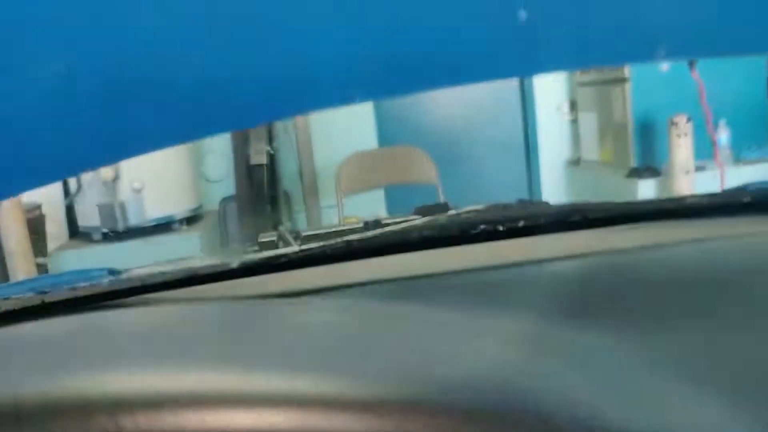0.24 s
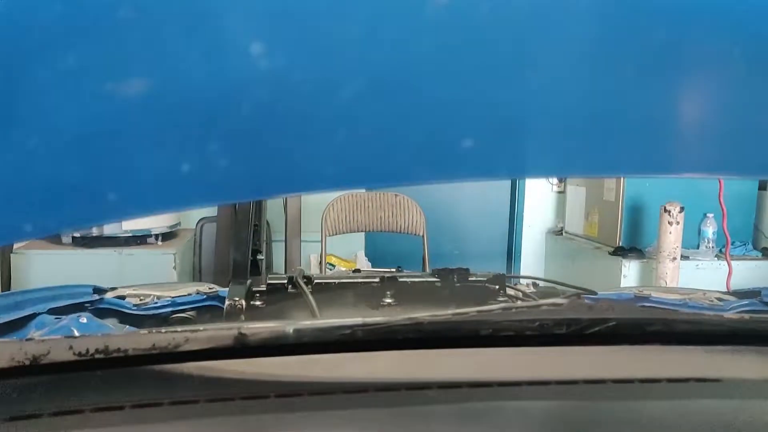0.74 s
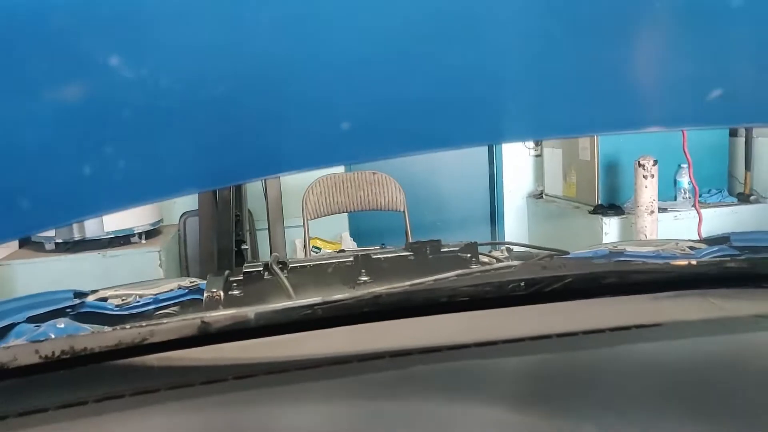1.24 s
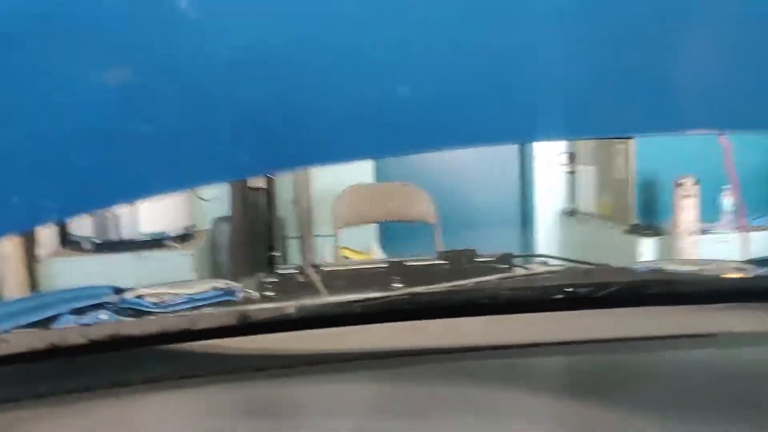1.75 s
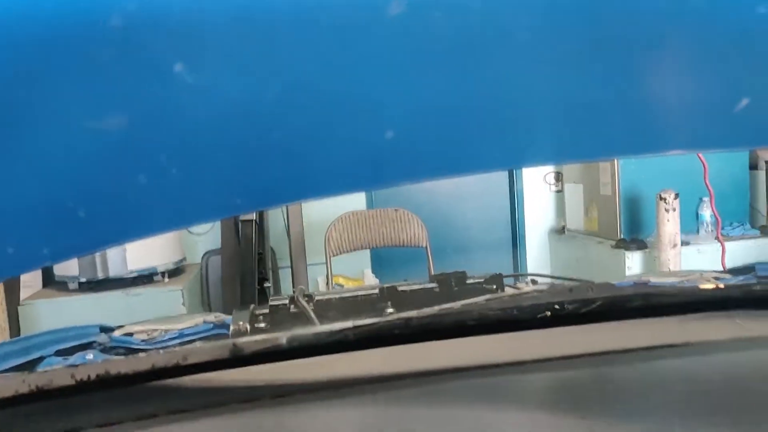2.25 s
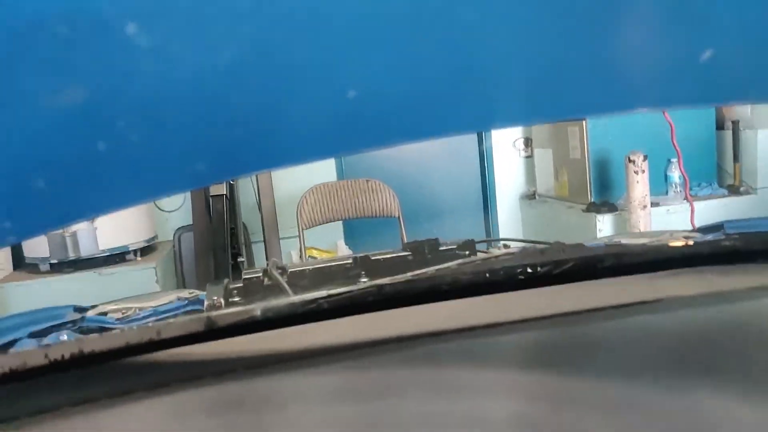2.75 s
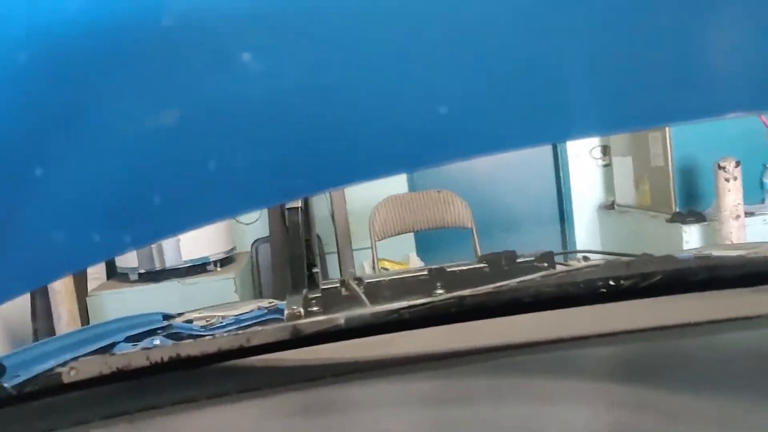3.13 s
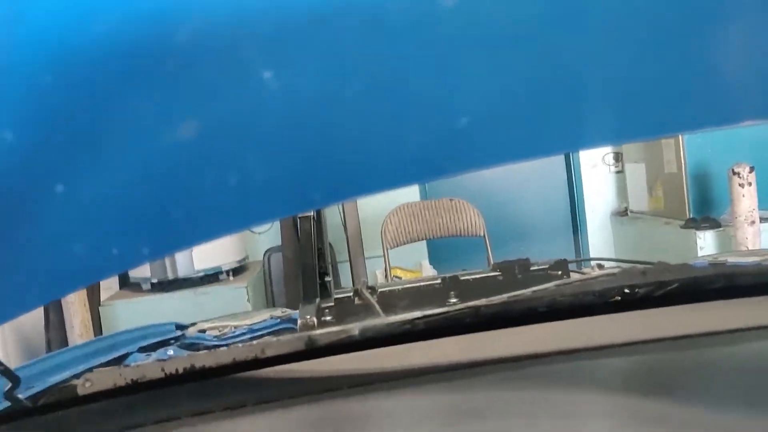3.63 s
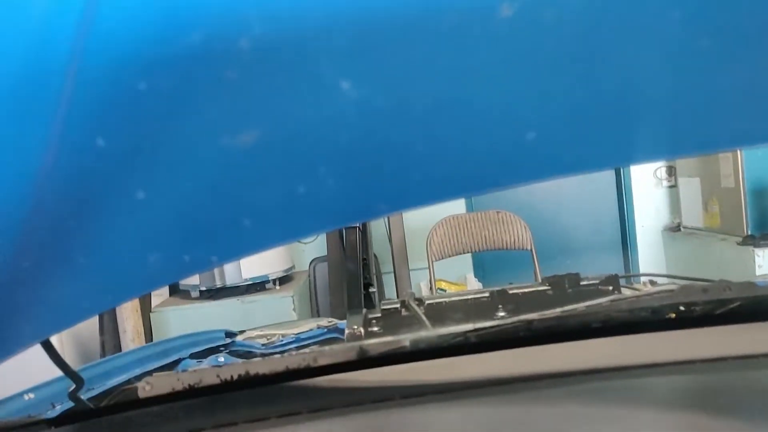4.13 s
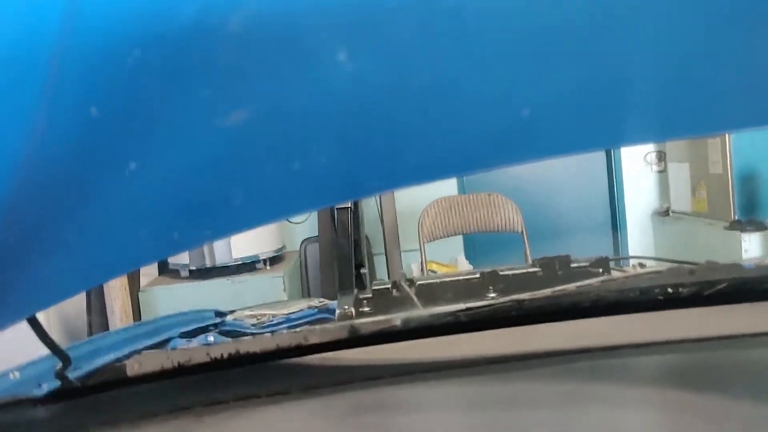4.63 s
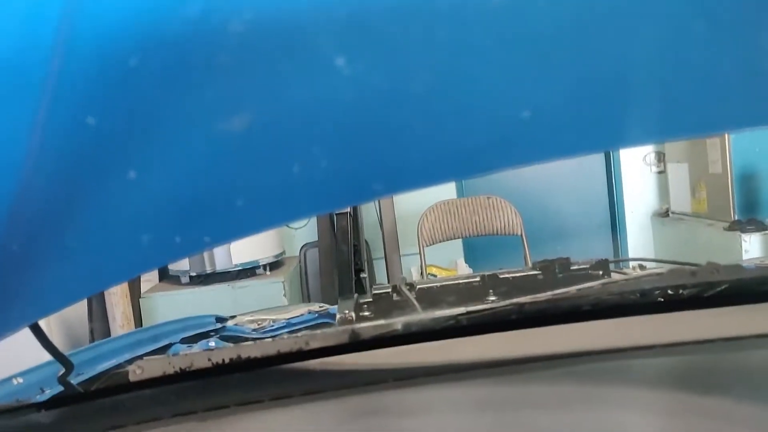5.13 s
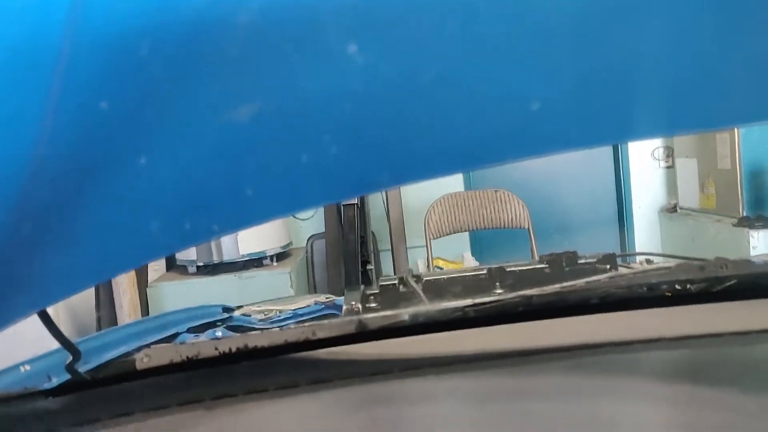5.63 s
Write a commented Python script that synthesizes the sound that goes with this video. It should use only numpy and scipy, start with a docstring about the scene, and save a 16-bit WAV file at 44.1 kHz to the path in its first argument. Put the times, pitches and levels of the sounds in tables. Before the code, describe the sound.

A misfiring car engine hunts up and down inside a close, boomy cabin. It begins fast and fairly steady, stumbles, then repeatedly catches itself with hollow, throaty gulps of air. Dry clicks and metallic rattles come and go in bursts, and a faint high fizz returns about every second and a half. Handheld stereo pickup, brightest treble leaning right.

```python
"""Driver's seat, bonnet up: a four-cylinder car engine drops from a fast idle and hunts, close to stalling.
Crank speed times everything. Uneven firing pulses, filtered, boom in the cabin and shake the body panels.
Noise gated by the intake strokes roars, hisses and rings the intake duct and air box at each recovery.
Loose metal clatters in noise bursts about once a crank turn, with a few dry clicks.
A thin fizz of noise and high sines returns at even intervals."""
import sys
import numpy as np
from scipy import signal
from scipy.fft import rfft, irfft
from scipy.io import wavfile
from scipy.ndimage import uniform_filter1d, map_coordinates

SR = 44100
rng = np.random.default_rng(int(sys.argv[2]) if len(sys.argv) > 2 else 0)


def wav_out(sig):
    """Save sig, one row per channel (or a flat mono array), as 16-bit PCM at SR to the path in sys.argv[1]."""
    wavfile.write(sys.argv[1], SR, np.round(np.clip(np.atleast_2d(sig).T, -1, 1) * 32767).astype(np.int16))


N = 259123
TIME = np.arange(N) / SR
FREQS = np.arange(N // 2 + 1) * SR / N + 0.00091  # offset keeps log(0) away

# Hunting idle. Each row: time in seconds, crank speed in turns per second.
CRANK = [(0, 31), (.7, 30.1), (.85, 27), (1, 20.3), (1.45, 19.8), (1.93, 25.5), (2.1, 23.3), (2.7, 22.8),
         (2.93, 25.2), (3.2, 20.9), (3.5, 21), (3.7, 19.3), (4.03, 24.5), (4.3, 22), (4.5, 22.5),
         (4.68, 18.7), (5.15, 22.6), (5.88, 19.3)]
# Gulps of air by which the engine catches itself. Each row: start in seconds, hold length in seconds,
# swell time in seconds, air flow in dB re a full surge, relative body shudder in dB.
SURGES = [(0.523, 0.16, 0.014, -4, -15.5), (0.66, 0.07, 0.015, -6, -23), (0.806, 0.059, 0.022, -6.5, -21.5),
          (0.992, 0.3, 0.085, -3.5, -20.5), (1.219, 0.32, 0.025, -5, -21), (1.502, 0.18, 0.027, -4, -28),
          (1.775, 0.21, 0.0044, -3, -17.5), (2.016, 0.096, 0.031, -4, -28), (2.189, 0.078, 0.06, -2.5, -18),
          (2.378, 0.053, 0.027, -3, -20.5), (2.557, 0.13, 0.0098, -7, -24.5),
          (2.72, 0.16, 0.031, -5.5, -19.5), (2.823, .14, 0.019, -5, -18), (3.004, 0.07, 0.019, -5.5, -22),
          (3.201, 0.27, 0.0089, -9.5, -22.5), (3.598, 0.46, 0.038, -2.5, -18),
          (4.06, 0.1, 0.02, -14, -25.5), (4.552, 0.28, 0.056, -5.5, -20), (4.729, 0.33, 0.067, -1, -16),
          (5.756, 0.17, 0.18, 6.5, -9.5)]
# Intake duct resonances. Each row: frequency in Hz, half-width in Hz, relative level in dB.
DUCT = [(540, 95, -8.5), (686.6, 32.4, -0.5), (916, 54, -11.5), (1158, 48, -8.5), (1238, 58, -8.5),
        (1580, 190, -16.5)]
FAST_IDLE_HZ = 27  # crank speed: fast-idle cylinder balance above, light knocks only below


def scene(boom_db=3.0, shudder_db=-1.0):
    """Crank speed times the layers, surges set their strength; the left side is shaded in most of the treble."""
    # Idle between surges. Each row: time in seconds, air flow in dB re a full surge, relative shudder in dB.
    idle = [(0, -8.5, -25), (.3, -10.5, -23.5), (.5, -10, -23), (1, -13.5, -25.5), (1.7, -13.5, -21),
            (2.5, -16, -25), (3.2, -10.5, -24), (3.55, -7.5, -26), (4.13, -14.5, -26), (4.24, -14, -26),
            (4.37, -15, -33), (4.52, -16, -27.5), (5.2, -10.5, -24), (5.35, -13.5, -28.5),
            (5.55, -13, -26.5), (5.72, -6.5, -22)]
    # Side balance. Each row: frequency in Hz, left minus right in dB.
    sides = [(30, 0.7), (150, 2.1), (700, 1.5), (1200, 1.9), (2500, -2), (4500, 0.1), (6300, 3), (7200, -4),
             (8300, -13), (12000, -11), (15500, -8)]
    # Air layer laws, one row each: level in dB at full surge, dB per dB of flow, dB lost running freely.
    throat_law = (-26, 1.39, 4.5)
    roar_law = (-31, 1, 0.16)
    hiss_law = (-32.5, 1.63, 5.4)

    turns = np.cumsum(crank_hz()) / SR
    idle_flow_db, idle_shake_db = curves(idle)
    *_, surge_flow_db, surge_shake_db = np.transpose(SURGES)
    flow_db = surging(idle_flow_db, surge_flow_db)
    shake_db = surging(idle_shake_db, surge_shake_db)

    pulses = firings(turns)
    lows = undb(stumbling() + boom_db) * boom(pulses)
    lows = lows + undb(shake_db + shudder_db) * shudder(pulses, turns) + thuds()

    mids = throat(turns, follow(throat_law, flow_db))
    mids = mids + undb(follow(roar_law, flow_db)) * intake(turns) + chuffs()

    highs = undb(follow(hiss_law, flow_db)) * (hiss(turns) + chatter(turns))
    highs = highs + rush(turns) + clatter(turns, flow_db) + clicks()

    ears = undb(shape(sides) * np.array([[.5], [-.5]]))
    ears = ears / np.sqrt(np.mean(ears ** 2, axis=0))
    return irfft(rfft(lows + mids + highs) * ears, N) + fizz()


def firings(turns, jitter_s_per_db=0.00083):
    """Two pulses a turn; unequal cylinders, random strength and timing make the beat limp."""
    # Firing scatter. Each row: time in seconds, standard deviation of strength in dB.
    scatter = [(0, .8), (.5, 1), (.6, 2.4), (.9, 2.6), (2.4, 1.7), (3.6, 2.4), (4.5, 3), (5.88, 2.8)]
    # Cylinder strengths in firing order in dB, hunting and at the fast idle.
    hunting_db = [4, -3, -3, -2]
    fast_db = [5.5, -5, -0.5, -5]

    at = np.flatnonzero(np.diff(np.floor(2 * turns), prepend=-1))
    chance = rng.standard_normal((len(at), 2))
    scatter_db = curves(scatter)[0][at]
    fast = crank_hz()[at] > FAST_IDLE_HZ
    cylinder_db = np.where(fast, np.resize(fast_db, len(at)), np.resize(hunting_db, len(at)))
    shift = (jitter_s_per_db * SR * scatter_db * chance[:, 1]).astype(int)
    pulses = np.zeros(N)
    pulses[np.clip(at + shift, 0, N - 1)] = undb(cylinder_db + scatter_db * chance[:, 0])
    return pulses - pulses.mean()


def boom(pulses):
    """The firings pump the low air modes of the cabin."""
    # Cabin response. Each row: frequency in Hz, gain in dB.
    cabin = [(10, -28), (20, -2), (27, 3.5), (31, 5.8), (36, -.3), (45, 1.6), (53, -2), (62, 2.5),
             (74, -13), (110, -35), (300, -80), (3000, -140)]
    return even(colour(pulses, shape(cabin)), span_s=0.037)


def stumbling(half_width_s=0.022):
    """Boom level in dB, before the overall boom gain: a slow curve with a brief dip at each stumble."""
    # Boom curve. Each row: time in seconds, relative level in dB.
    boom_level = [(0, -15), (1.1, -16), (1.9, -15), (2.6, -16), (2.9, -14), (3.7, -18.5), (3.92, -14),
                  (4.25, -19), (4.6, -20), (4.98, -13.5), (5.3, -20.5), (5.55, -20.5), (5.88, -16)]
    # Stumbles. Each row: time in seconds, dip in dB (negative lifts).
    stumbles = [(.6, 3.5), (.86, 1), (.95, 6), (1.19, 24), (1.38, -1), (1.718, 8), (2.0, 10.5), (2.17, 7),
                (2.33, 1), (2.49, 3), (2.69, 16), (3.0, 5.5), (3.16, 8), (3.34, 12), (3.575, 4), (4.24, 7),
                (4.47, 10), (4.64, 2), (4.75, 6), (5.5, 13)]
    dips_db = sum(db * np.exp(-((TIME - s) / half_width_s) ** 2) for s, db in stumbles)
    return curves(boom_level)[0] - dips_db


def shudder(pulses, turns, loose_db=4.0):
    """Body panels follow the firings and also rumble loosely, as noise, after each."""
    # Panel response. Each row: frequency in Hz, gain in dB.
    body = [(40, -44.5), (80, 0), (95, 6), (115, -0.5), (150, -3), (200, -3.5), (250, -7.5), (310, -11.5),
            (400, -16.5), (480, -20), (800, -38.5), (3000, -100), (9000, -140)]
    forced = unit(colour(pulses, shape(body)))
    kicks = puffs(2 * turns, decay=.5, scatter_db=2)
    loose = unit(colour(air(0 * FREQS) * kicks, shape(body)))
    return even(forced + undb(loose_db) * loose, span_s=0.036)


def thuds(rise_s=.004, t60=.07):
    """A hard firing shakes a panel: a decaying sine."""
    # Thuds. Each row: start in seconds, level in dB ahead of the envelope, pitch in Hz.
    thud_rows = [(.171, -21, 195), (.236, -19, 193), (.301, -9, 198), (.366, -16, 192), (0.433, -10.5, 189),
                 (0.499, -7.5, 166), (0.615, -7, 165), (0.76, -6.5, 144), (1.042, -22, 177),
                 (1.45, -9, 152), (1.715, -8, 142), (1.893, -8.5, 196), (1.932, -9, 195), (2.069, -13, 137),
                 (2.119, -12, 157), (2.836, -11, 174), (3.64, -7.5, 188), (3.743, -16, 395),
                 (3.99, -10, 225), (4.821, -9, 240), (4.969, -7, 276), (5.23, -23, 208), (5.739, -10, 174),
                 (5.779, -15, 210), (5.834, -3, 239)]
    out, age = np.zeros(N), TIME[:SR // 5]
    envelope = (1 - np.exp(-age / rise_s)) * np.exp(-np.log(1000) * age / t60)
    for s, db, hz in thud_rows:
        i = int(s * SR)
        blow = undb(db) * envelope * np.sin(2 * np.pi * (hz * age + rng.random()))
        out[i:i + len(age)] += blow[:N - i]
    return out


def surging(idle_db, peaks_db):
    """A level in dB: each surge swells, holds and dies away, its power added to the idle."""
    release_s = 0.046
    power = undb(idle_db) ** 2
    for (start, length, swell_s, *_), db in zip(SURGES, peaks_db):
        swell = 1 - np.exp(-np.maximum(TIME - start, 0) / swell_s)
        fade = np.exp(-np.maximum(TIME - start - length, 0) / release_s)
        power = power + (undb(db) * swell * fade) ** 2
    return 10 * np.log10(power)


def follow(law, flow_db, labour_hz=21, free_hz=23.9):
    """Layer level in dB: grows with air flow, eases as the crank goes from labouring to free running."""
    full_db, slope, lost_db = law
    free = np.clip((crank_hz() - labour_hz) / (free_hz - labour_hz), 0, 1)
    return full_db + slope * flow_db - lost_db * free


def gulps(turns):
    """Turbulent air drawn in at each intake stroke."""
    drawn = swaying(air(ripples(ripple_db=4.6, spacing_hz=54)))
    return drawn * puffs(2 * turns, decay=1.0, scatter_db=3.5)


def intake(turns):
    """The broad roar of the intake: gulps through a fixed spectrum."""
    # Roar spectrum. Each row: frequency in Hz, gain in dB.
    roar = [(150, -33), (330, -1.5), (470, 5.5), (600, 5), (800, 5.5), (980, 2), (1300, -6.5), (1600, -1.5),
            (2000, -9), (2600, -9.5), (4000, -20), (9000, -37)]
    return even(colour(gulps(turns), shape(roar)), span_s=0.035)


def throat(turns, throat_db, box_db=4, box_growth=0.42, duct_db=-3.5):
    """The duct sings with the flow; the deeper air box gains on it as the flow grows."""
    # Air box resonances. Each row: frequency in Hz, half-width in Hz, relative level in dB.
    air_box = [(250, 25, -7), (295, 22, -3), (342, 20, 1), (392, 22, 1)]
    box_gain = undb(box_db + box_growth * (throat_db - throat_db.max()))
    box = box_gain * hollow(turns, air_box, centre_hz=310)
    duct = undb(duct_db) * hollow(turns, DUCT, centre_hz=680)
    return undb(throat_db) * (duct + box)


def hollow(turns, modes, centre_hz):
    """The gulps ring a cavity with a hollow note."""
    return even(colour(gulps(turns), cavity(modes, centre_hz)), span_s=0.07)


def cavity(modes, centre_hz):
    """Response in dB of a cavity: summed resonances under a broad hump."""
    gain = sum(undb(db) / (1 + (FREQS - hz) ** 2 / width ** 2) for hz, width, db in modes)
    return 20 * np.log10(gain) + band(centre_hz, octaves=1.74)


def chuffs(centre_hz=690):
    """A hard gulp barks in the duct: a short burst of noise with its resonances."""
    # Chuffs. Each row: start in seconds, level in dB ahead of the envelope.
    chuff_rows = [(1.093, -21), (1.143, -30), (1.163, -18), (1.195, -16.5), (1.215, -20), (1.262, -17),
                  (1.279, -15), (1.318, -27), (1.365, -16), (1.4, -17), (1.444, -16.5), (1.466, -12.5),
                  (1.497, -14.5), (1.612, -25), (1.894, -30), (2.926, -29), (3.62, -21.5), (3.669, -16),
                  (3.74, -19), (3.823, -15.5), (3.87, -21), (3.945, -25), (4.655, -21), (4.742, -21),
                  (4.765, -28), (4.819, -13), (4.87, -27), (4.902, -14), (4.97, -25), (5.759, -28),
                  (5.778, -17.5), (5.812, -28), (5.836, -16)]
    s, db = np.transpose(chuff_rows)
    note = even(air(cavity(DUCT, centre_hz) + band(centre_hz, octaves=.8)), span_s=.008)
    return note * strikes(s, db, rise_s=.004, t60=.06)


def hiss(turns, valve_share=0.25):
    """Air rushes past the throttle in a coarse flutter; the valves tick in it and its colour slides."""
    # Hiss spectrum. Each row: frequency in Hz, gain in dB.
    spectrum = [(300, -44), (900, -31), (1800, 10), (2700, 10), (3500, 6.5), (4400, 10.5), (5200, 6),
                (6300, 12.5), (7200, 3.5), (8500, -2.5), (11000, -1), (15700, -3)]
    rushing = swaying(air(ripples(ripple_db=5.5, spacing_hz=70)))
    ticking = 1 - valve_share + valve_share * puffs(2 * turns, decay=0.089, scatter_db=11.0)
    flutter = grain(contacts_per_s=220, scatter_db=2.4)
    return unit(colour(rushing, shape(spectrum))) * ticking * flutter


def rush(turns):
    """A coarse, bright rush of air that flutters with the intake strokes."""
    # Rush. Each row: time in seconds, level in dB.
    rush_level = [(0, -56.5), (1, -53.5), (1.13, -45), (1.27, -38.5), (1.55, -41.5), (1.68, -47),
                  (1.75, -59), (5.88, -62)]
    flutter = puffs(2 * turns, decay=1.3, scatter_db=2)
    coarse = grain(contacts_per_s=400, scatter_db=4)
    bright = air(band(5500, octaves=.72) + ripples(ripple_db=1.5, spacing_hz=190))
    return undb(curves(rush_level)[0]) * flutter * coarse * bright


def clatter(turns, flow_db, ring_db=-1, sizzle_db=-2.0, clank_db=1, ripple_db=2):
    """Loose metal is thrown against its seat, buzzes there in coarse contacts and rings in its modes."""
    # Ring spectrum. Each row: frequency in Hz, gain in dB.
    metal = [(500, -52), (1500, 6), (3500, -6.5), (4400, 3), (5200, -3), (6400, 6.5), (7300, -1),
             (9000, 1.5), (11500, -1.5), (14000, -29)]
    s, db, sizzle, clank = np.transpose(knocks(turns, flow_db))
    contact_s = .001
    buzz = grain(contacts_per_s=1100, scatter_db=4.2)
    ring = air(shape(metal)) * strikes(s, db + ring_db, contact_s, t60=0.055)
    top = air(band(15200, octaves=0.47)) * strikes(s, db + sizzle + sizzle_db, contact_s, t60=0.027)
    low = air(band(1400, octaves=2.07)) * strikes(s, db + clank + clank_db, contact_s, t60=0.061)
    modes_db = metal_peaks() + ripples(ripple_db, spacing_hz=161.3)
    return colour(buzz * (ring + top + low), modes_db)


def knocks(turns, flow_db):
    """Rows (s, dB, sizzle dB, clank dB): listed knocks, and light ones on the other slow crank turns."""
    # Listed knocks, from hard blows to faint ticks in the lulls.
    # Each row: time in seconds, relative level in dB, sizzle in dB re the knock.
    listed = [(0.593, -27.5, 4), (0.769, -32, 7), (1.039, -43, -21), (1.088, -32.5, -18),
              (1.139, -31.5, -20), (1.1907, -29.5, -18), (1.243, -26, -18), (1.3428, -28.5, -16),
              (1.394, -34, -18), (1.443, -32, -14), (1.613, -39, -11), (1.844, -26, 6), (1.886, -23, 8.5),
              (1.927, -21, 6), (1.963, -23.5, 7), (1.999, -30, 3), (2.043, -35, -7), (2.121, -28.5, 2),
              (2.193, -33.5, 9), (2.234, -26.5, 6), (2.2758, -26, 8), (2.386, -49, -17), (2.462, -37.5, 1),
              (2.56, -51.5, -19), (2.6365, -36.5, 6), (2.734, -62, -13), (2.7925, -34.5, 8),
              (2.835, -31, -1), (2.8808, -24, 9), (2.9198, -25, 10), (2.96, -22.5, 6), (2.982, -27.5, 0),
              (2.997, -28.5, 5), (3.053, -35, 0), (3.165, -39.5, -8), (3.215, -33.5, 4), (3.234, -35, -3),
              (3.263, -31, -2), (3.283, -33, -2), (3.313, -36, -1), (3.334, -33.5, -4), (3.367, -33, -6),
              (3.412, -35, -5), (3.432, -37, -3), (3.462, -33.5, -3), (3.6622, -27, 0), (3.955, -22.5, 7),
              (3.9984, -21.5, 7), (4.038, -25.5, 7), (4.064, -28, 6), (4.077, -28.5, 5), (4.138, -41, -14),
              (4.158, -45, -16), (4.263, -44, -16), (4.3195, -48, -16), (4.343, -45, -14),
              (4.3865, -51, -16), (4.4385, -42, -14), (4.458, -41.5, -14), (4.474, -54, -14),
              (4.53, -48, -14), (4.566, -66, -24), (4.631, -33.5, -15), (4.683, -31, -2),
              (4.7404, -27.5, 0), (4.845, -24.5, -7), (5.039, -26, 10), (5.113, -25, 7), (5.139, -28.5, 3),
              (5.2153, -36.5, -3), (5.263, -43, -12), (5.372, -41.5, 5), (5.422, -40.5, -10),
              (5.437, -38, 0), (5.4697, -63, -8), (5.482, -43, 4), (5.571, -43, -10), (5.633, -47, -12),
              (5.658, -35, -9), (5.755, -32.5, 9), (5.808, -29, 5)]
    listed_clank_db, light_clank_db, light_sizzle_db = -6, -2, -18  # re the knock
    light_db, light_scatter_db, db_per_flow_db = -34, 3, .8  # light_db is at full surge

    at = np.flatnonzero(np.diff(np.floor(turns)))
    hz = crank_hz()[at]
    db = light_db + db_per_flow_db * flow_db[at] + light_scatter_db * rng.standard_normal(len(at))
    turns_from_listed = hz * np.abs(TIME[at, None] - np.array(listed)[:, 0]).min(axis=1)
    free = (hz < FAST_IDLE_HZ) & (turns_from_listed > 1)
    light = [(s, size, light_sizzle_db, light_clank_db) for s, size in zip(TIME[at][free], db[free])]
    return [(*row, listed_clank_db) for row in listed] + light


def metal_peaks():
    """The modes of the loose metal as humps in dB."""
    # Metal modes. Each row: frequency in Hz, full width in Hz, height in dB.
    modes = [(4050, 60, 3), (4471, 100, 6), (5799, 90, 7), (6380, 130, 7), (8942, 80, 5), (9400, 90, 4),
             (10250, 90, 4), (13830, 150, 3), (14656, 120, 6), (15212, 130, 11)]
    return sum(gain / (1 + (2 * (FREQS - hz) / width) ** 2) for hz, width, gain in modes)


def chatter(turns, level_db=-6, taps_per_turn=3.1):
    """Below the fast idle the shaking engine keeps the loose metal tapping lightly; level re the hiss."""
    # Tapping spectrum. Each row: frequency in Hz, gain in dB.
    spectrum = [(700, -43), (2000, -40), (4400, -47), (6400, -28), (7600, 14), (10000, 11.5), (13000, 14),
                (15700, 12)]
    shaken = np.clip((30 - crank_hz()) / 3, .02, 1)
    fired = puffs(2 * turns, decay=0.5, scatter_db=5)
    tapped = puffs(taps_per_turn * turns, decay=0.6, scatter_db=5)
    return undb(level_db) * shaken * unit(fired + tapped) * air(shape(spectrum) + metal_peaks())


def clicks(snap_hz=4000, knock_hz=1100):
    """A few dry clicks: a bright snap over a dull knock, both noise bursts."""
    # Clicks. Each row: time in seconds, snap in dB, knock in dB, both ahead of the envelope.
    click_rows = [(.289, -35, -42), (.594, -22, -27), (1.782, -13, -23), (1.791, -23, -19),
                  (1.825, -28, -27)]
    s, snap_db, knock_db = np.transpose(click_rows)
    snap = strikes(s, snap_db, rise_s=0.0002, t60=0.004)
    knock = strikes(s, knock_db, rise_s=0.0003, t60=0.008)
    return air(band(snap_hz, octaves=1.55)) * snap + air(band(knock_hz, octaves=0.39)) * knock


def fizz(length_s=0.25, noise_db=-50, whistle_db=-57, spurt_db=-39, ease_s=.05):
    """A thin noise with faint high sines starts with a spurt and dies away again."""
    # Start times in seconds.
    starts = [0.661, 2.1, 3.55, 5.003]
    # Whistles. Each row: frequency in Hz, relative level in dB.
    whistle_rows = [(7144, -5), (7481, 0), (7748, -5), (7971, -1), (8340, -3), (8942, -4), (9960, -10)]
    # Fizz spectrum. Each row: frequency in Hz, gain in dB.
    spectrum = [(1500, -20), (3000, -22), (6000, 2), (8000, 6), (11000, 3), (15000, -9)]
    corners_s = [0, ease_s / 2, length_s - ease_s, length_s + ease_s / 2]
    gate = sum(np.interp(TIME - s, corners_s, [0, 1, 1, 0]) for s in starts)
    spurt = strikes(starts, np.full(len(starts), spurt_db), rise_s=0.00044, t60=0.86)
    sines = [undb(db) * np.sin(2 * np.pi * (hz * TIME + rng.random())) for hz, db in whistle_rows]
    steady = undb(noise_db) * air(shape(spectrum)) + undb(whistle_db) * unit(sum(sines))
    return gate * steady + spurt * air(band(4300, octaves=1.4))


def air(db):
    """Coloured stereo noise of rms 1: a direct share that reaches the right first, and a diffuse share."""
    # Side likeness. Each row: frequency in Hz, direct share of the power from 0 to 1.
    likeness = [(60, 0.91), (150, 0.96), (300, 0.86), (600, 0.36), (1200, 0.081), (6000, 0.08),
                (15000, 0.081)]
    left_lag_s = .0004  # from 900 Hz up; shrinks in proportion below
    like = np.clip(shape(likeness), 0, 1)
    lag_s = np.array([[left_lag_s], [0]]) * np.minimum(FREQS / 900, 1)
    direct = rfft(rng.standard_normal(N)) * np.exp(-2j * np.pi * FREQS * lag_s)
    diffuse = rfft(rng.standard_normal((2, N)))
    return unit(irfft((np.sqrt(like) * direct + np.sqrt(1 - like) * diffuse) * undb(db), N))


def ripples(ripple_db=6.0, spacing_hz=70):
    """A random ripple over frequency, different on each side, colours the noise (dB)."""
    knots = np.arange(0, SR / 2, spacing_hz)
    heights = rng.standard_normal((2, 2000))
    return ripple_db * np.array([np.interp(FREQS, knots, h[:len(knots)]) for h in heights])


def swaying(x, depth=.022, rate_hz=1.1):
    """A varying delay slides the colour of a steady noise up and down; depth is the pitch share per sine."""
    rates_hz = rate_hz * np.array([.62, 1.47])
    lag_s = 0
    for r in rates_hz:
        lag_s = lag_s + depth / (2 * np.pi * r) * np.sin(2 * np.pi * (r * TIME + rng.random()))
    at = (TIME + lag_s) * SR
    return np.array([map_coordinates(side, [at], order=3, mode="mirror") for side in x])


def puffs(cycles, decay, scatter_db, rise=0.096):
    """A quick puff at the start of each cycle, each of its own size; decay and rise in cycles, rms 1."""
    sizes = undb(scatter_db * rng.standard_normal(1000))
    phase = cycles % 1
    return unit(sizes[cycles.astype(int)] * np.exp(-phase / decay) * (1 - np.exp(-phase / rise)))


def strikes(times, db, rise_s, t60):
    """Envelope of blows that swell fast and decay 60 dB per t60 seconds, cut at 0.2 s; powers add."""
    power = np.zeros(N)
    for s, size in zip(times, undb(db)):
        i = int(s * SR)
        age = TIME[:min(SR // 5, N - i)]
        blow = size * (1 - np.exp(-age / rise_s)) * undb(-60 * age / t60)
        power[i:i + len(age)] += blow ** 2
    return np.sqrt(power)


def grain(contacts_per_s, scatter_db):
    """Tiny contacts of uneven strength, as a gain of rms 1."""
    at = np.arange(0, N, SR / contacts_per_s)
    sizes = rng.uniform(-1, 1, len(at))
    return unit(undb(scatter_db * np.interp(np.arange(N), at, sizes)))


def crank_hz():
    """Crankshaft turns per second at every sample."""
    return curves(CRANK)[0]


def undb(db):
    """Decibels to gain."""
    return 10 ** (np.asarray(db) / 20)


def curves(table):
    """Each column of a timed table, joined by straight lines."""
    s, *columns = np.transpose(table)
    return [np.interp(TIME, s, c) for c in columns]


def shape(points):
    """Values of (Hz, value) points at every frequency, interpolated over log frequency."""
    hz, value = np.transpose(points)
    return np.interp(np.log(FREQS), np.log(hz), value)


def band(centre_hz, octaves):
    """A rounded hump in dB, 10 dB down at the given octaves off centre, floor -60 dB."""
    return np.maximum(-10 * (np.log2(FREQS / centre_hz) / octaves) ** 2, -60)


def colour(x, db):
    """Causal minimum-phase filter with the given gain per frequency."""
    cepstrum = irfft(db * np.log(10) / 20, N)
    cepstrum[..., 1:N // 2] *= 2  # fold onto positive time
    cepstrum[..., N // 2:] = 0
    return irfft(rfft(x) * np.exp(rfft(cepstrum)), N)


def unit(x):
    """Scale to rms 1."""
    return x / np.sqrt(np.mean(x ** 2))


def even(x, span_s):
    """Scale to a running rms of 1."""
    k = int(span_s * SR)
    power = np.mean(np.atleast_2d(x) ** 2, axis=0)
    smooth = uniform_filter1d(uniform_filter1d(power, k), k)
    return x / np.sqrt(smooth + 1e-12)


def record(dry, fade_s=.004, ceiling=.9, low_hz=6, top_hz=15900):
    """Fades the ends, rounds the highest peaks, cuts the deepest lows and the top."""
    faded = dry * np.minimum(np.minimum(TIME, TIME[::-1]) / fade_s, 1)
    rounded = faded / (1 + (faded / ceiling) ** 8) ** (1 / 8)
    rounded = signal.sosfilt(signal.butter(1, low_hz, "high", fs=SR, output="sos"), rounded)
    return signal.sosfilt(signal.ellip(8, .2, 70, top_hz, fs=SR, output="sos"), rounded)


dry = scene()
out = record(dry)
wav_out(out)
```